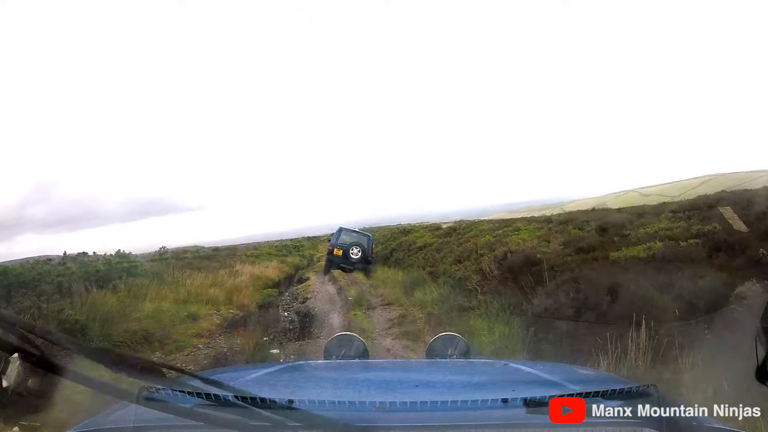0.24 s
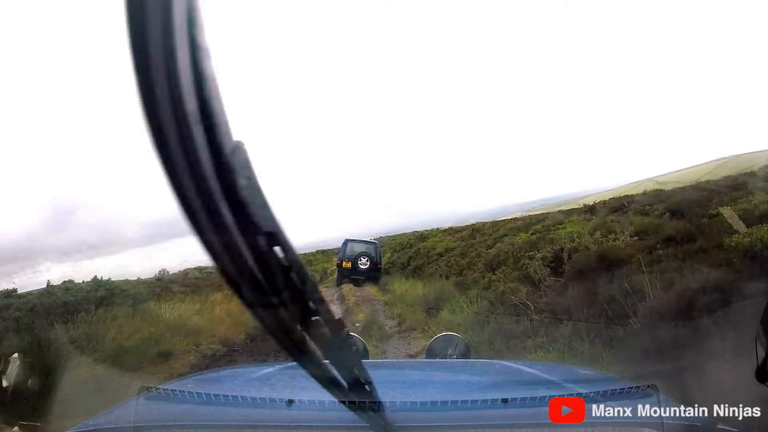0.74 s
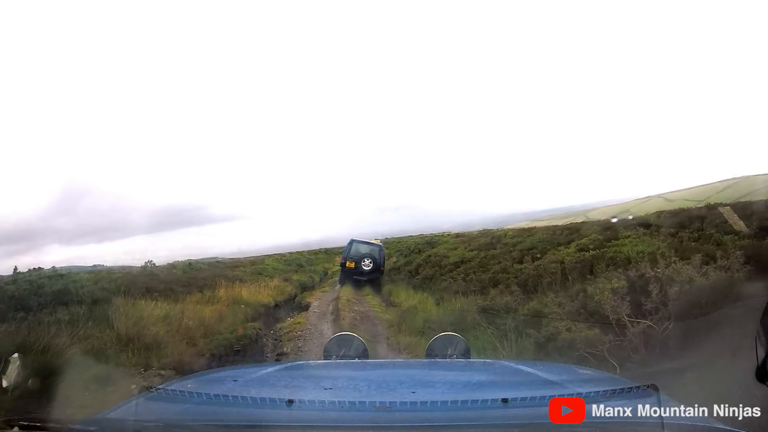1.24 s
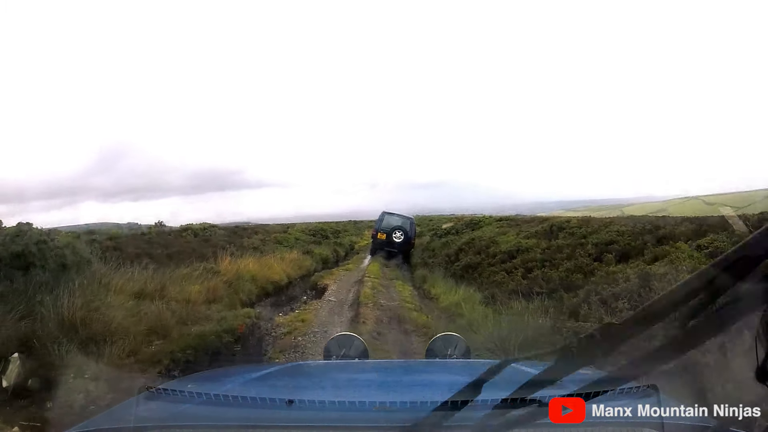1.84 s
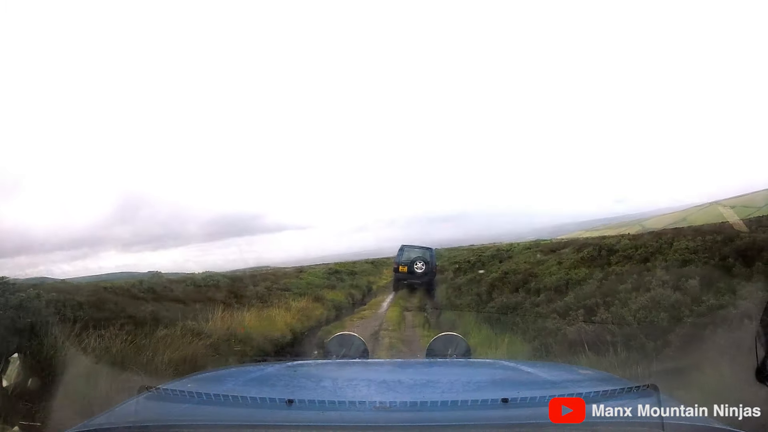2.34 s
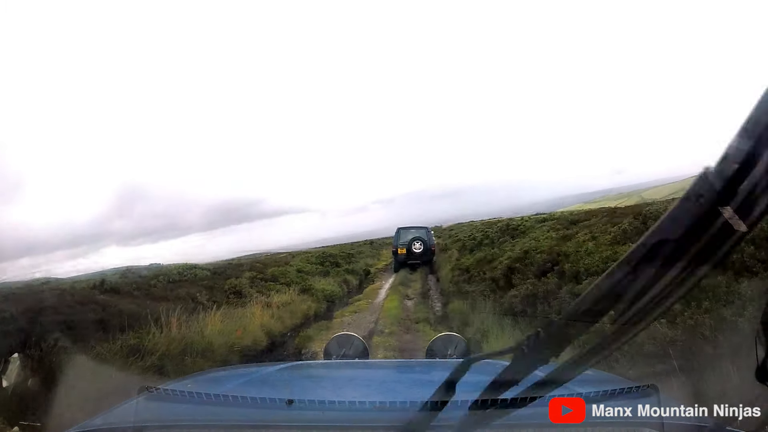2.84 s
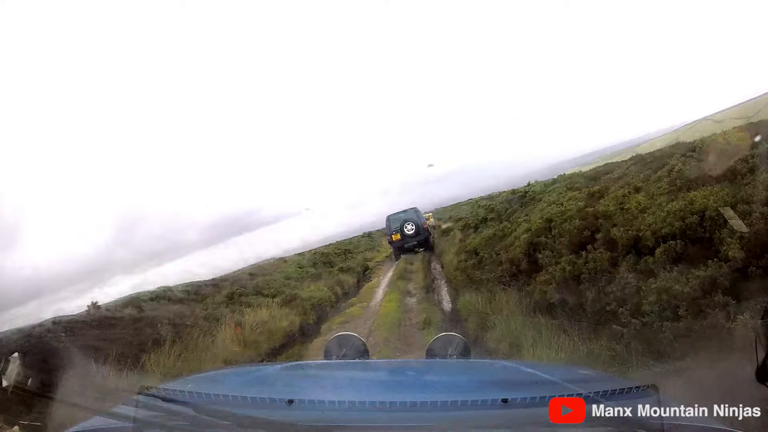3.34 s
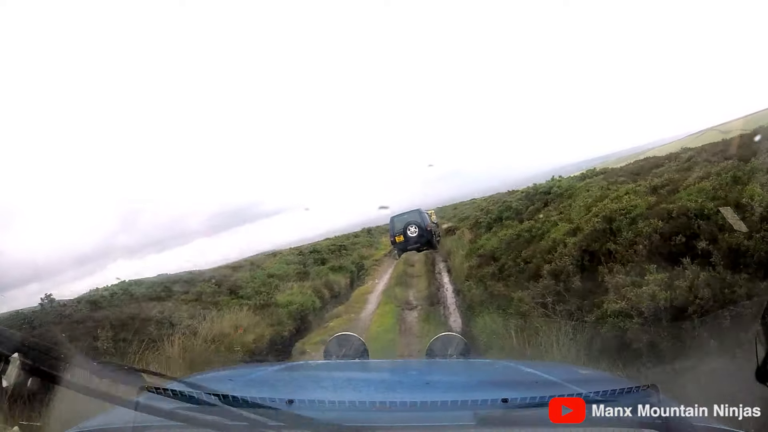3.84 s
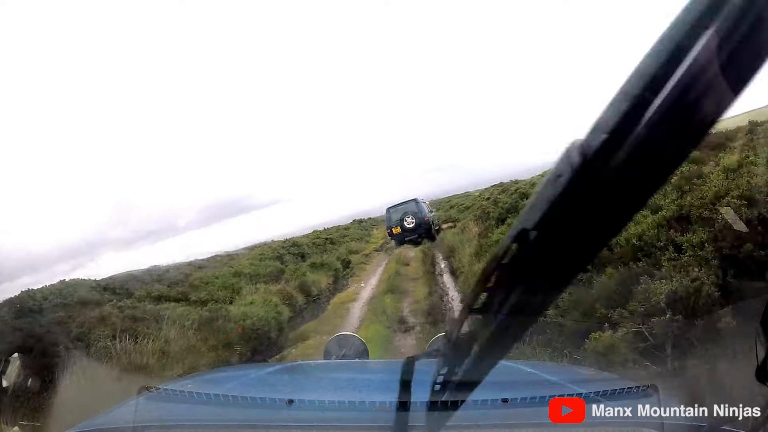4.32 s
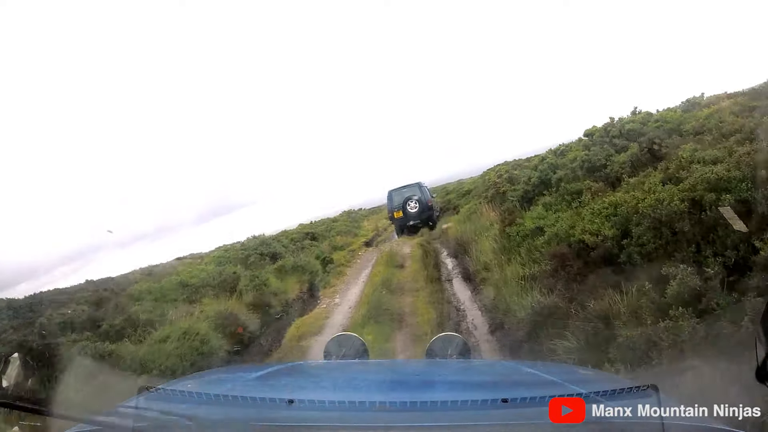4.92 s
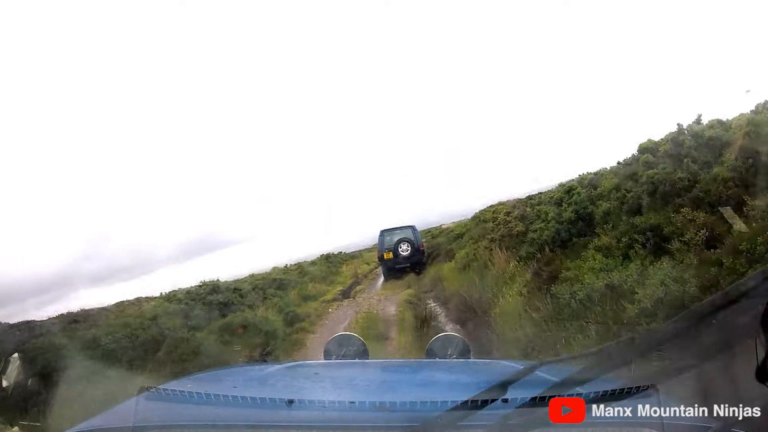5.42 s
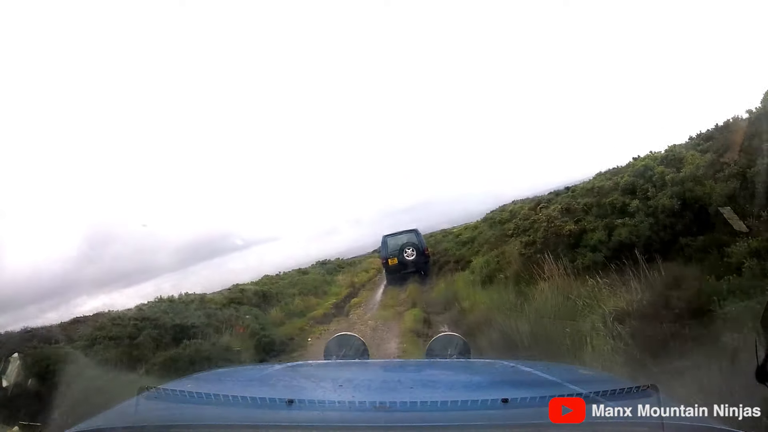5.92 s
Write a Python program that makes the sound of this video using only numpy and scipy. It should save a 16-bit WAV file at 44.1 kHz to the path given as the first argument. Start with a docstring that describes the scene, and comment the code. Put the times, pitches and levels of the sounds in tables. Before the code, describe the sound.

A low engine drone and booming bodywork fill the cabin of a small off-road vehicle driving over ruts. Dull suspension thuds come irregularly, hardest about a third of the way through and again near the end, while the engine pitch wavers and rises in the second half. The microphone is inside, on a plastic mount that gives thin, high creaks. Trim clicks and rustles, with soft wiper strokes and faint tyre hiss behind.

```python
"""Inside a small off-road car on a rutted track

A four-cylinder engine hums through the bulkhead at multiples of its firing rate. Ruts force the shell
and the cabin air into resonance, heard as boom and rumble, while trim rustles and tyres and air hiss.
The microphone's plastic mount creaks by stick-slip friction, and the wipers swish over the screen.
Loose trim ticks, and blows from the suspension ring the modes of the cabin."""
import sys
import numpy as np
from scipy import signal
from scipy.fft import rfft, irfft
from scipy.io import wavfile
from scipy.ndimage import uniform_filter1d

SR = 44100
rng = np.random.default_rng(int(sys.argv[2]) if len(sys.argv) > 2 else 0)


def store_pcm(level_fs):
    """Save levels as 16-bit WAV."""
    pcm = np.round(np.clip(level_fs, -1, 1) * 32767).astype(np.int16)
    wavfile.write(sys.argv[1], SR, np.atleast_2d(pcm).T)


N = 272273
TIME = np.arange(N) / SR

# The engine's course. Each row: time in seconds, firing rate in Hz, level of the fundamental in dB,
# levels of harmonics 2-3 and of harmonics 4-7 in dB ahead of the bulkhead.
ENGINE_COURSE = [(0.0, 47.74, -9, -29, -41), (0.29, 49.96, -11.5, -26.5, -43.5),
                 (0.6, 57.43, -10, -23, -25), (0.9, 51.07, -14.5, -42.5, -47),
                 (1.13, 47.4, -16.5, -31, -44), (1.48, 50.8, -9.5, -27, -30), (1.8, 44.6, -9, -30.5, -34),
                 (2.01, 47.9, -9.5, -33, -41), (2.16, 57.82, -12, -35.5, -26),
                 (2.42, 51.96, -12, -31.5, -32.5), (2.63, 52.92, -32, -31.5, -32),
                 (2.94, 56.74, -29.5, -34, -42.5), (3.13, 51.94, -12, -32, -29.5),
                 (3.54, 60.05, -14, -33, -28), (3.76, 61.54, -15, -22, -25.5),
                 (4.0, 75.53, -21, -34.5, -15.5), (4.12, 74.44, -23, -33, -21.5),
                 (4.25, 70.8, -17, -33.5, -30.5), (4.47, 70.2, -19.5, -30, -27.5),
                 (4.72, 62.97, -12.5, -46, -29.5), (4.93, 79.46, -18, -19.5, -24),
                 (5.12, 80.7, -22.5, -24.5, -20.5), (5.36, 64.96, -13.5, -36.5, -50),
                 (5.79, 63.68, -19, -31, -32.5), (5.98, 70.34, -21, -29.5, -24.5),
                 (6.17, 65.8, -16.5, -37, -35)]
# Transmission through the bulkhead. Each row: frequency in Hz, gain in dB.
BULKHEAD = [(95, -21), (125, 5.5), (155, 2), (190, -12), (235, -8.5), (295, -4.5), (330, -11), (375, -8),
            (450, -20), (600, -27)]
# Shaking by the track. Each row: time in seconds, then shell boom, ground rumble and trim rustle in dB.
TRACK_COURSE = [(0.0, -13.5, -34, -44), (0.25, -10, -31.5, -41.5), (0.6, -11, -26, -39),
                (0.85, -6.5, -28.5, -38), (1.1, -13, -36, -44.5), (1.4, -11, -32.5, -43.5),
                (1.56, -8.5, -27, -38), (1.8, -8, -32, -46), (1.95, -2.5, -20.5, -30.5),
                (2.23, -13, -31.5, -45), (2.46, -5.5, -34, -45.5), (2.62, -6, -27.5, -42.5),
                (2.8, -7, -42.5, -49), (3.02, -10, -34.5, -60), (3.28, -7.5, -23.5, -38),
                (3.58, -12, -34.5, -47.5), (4.0, -6, -24, -37.5), (4.25, -5.5, -22, -41),
                (4.45, -9, -27, -41), (4.64, -7, -23, -33.5), (4.8, -7.5, -30, -46), (5.07, -10, -29, -43),
                (5.26, -5, -22, -35), (5.6, -11.5, -34.5, -43.5), (5.9, -6.5, -28.5, -38),
                (6.17, -5, -30.5, -41)]
# Resonances of the shell and of the cabin. Each row: frequency in Hz, width in Hz, relative level in dB.
SHELL_MODES = [(18.2, 5.25, -4.5), (35, 11.7, -5), (65, 39.8, -14.5)]
CABIN_MODES = [(132, 22.4, 0), (210, 112, -5.5), (295, 47.8, -0.5), (357.6, 68, -3.5), (459.3, 89, -4),
               (603, 167, -11), (756, 147, -11.5), (980, 315, -18.5), (1850, 320, -31), (3054, 1400, -42)]
# Spectra of trim rustle and of tyre and air hiss. Each row: frequency in Hz, relative density in dB.
RUSTLE_SPECTRUM = [(500, -4.5), (900, 0), (1200, -4.5), (2000, -9.5), (2800, -17), (4000, -23.5),
                   (6000, -37), (9000, -53.5), (12000, -69.5), (16000, -100)]
HISS_SPECTRUM = [(1500, -8.5), (3000, -2.5), (4500, -8.5), (6000, -10.5), (8000, -15.5), (10500, -19),
                 (12500, -30.5), (16000, -46)]
# Single slips of the mount. Each row: start in seconds, strength in dB.
MOUNT_SLIPS = [(0.1413, -42.5), (0.1695, -47), (0.194, -47), (0.2144, -44), (0.259, -41), (0.2778, -44),
               (0.3611, -41.5), (0.619, -36), (0.6497, -37.5), (0.6822, -34.5), (0.699, -43), (0.721, -39),
               (0.7841, -46.5), (0.8631, -44), (1.034, -51), (1.0939, -36.5), (1.1196, -45.5), (1.182, -45),
               (1.5387, -43.5), (1.6153, -33), (1.686, -37.5), (1.7083, -49), (1.729, -45), (1.7478, -47),
               (1.811, -41), (1.895, -43), (1.9638, -37.5), (2.0789, -39.5), (2.1948, -43), (2.3257, -38),
               (2.3466, -35), (2.366, -36), (2.601, -36), (2.9962, -46), (3.2969, -43.5), (3.329, -46),
               (3.383, -48), (3.3966, -38), (3.4325, -37), (3.5491, -46), (3.5735, -38), (3.5992, -40.5),
               (3.6221, -39.5), (3.6551, -37.5), (3.6843, -37.5), (3.7057, -38), (3.7349, -36),
               (3.843, -40.5), (4.2759, -45.5), (4.5148, -32), (4.6192, -44), (4.72, -36), (4.776, -38),
               (4.7963, -39), (4.809, -41), (4.821, -43), (4.8438, -40.5), (4.9146, -43), (5.0957, -43),
               (5.103, -44), (5.112, -43), (5.125, -41), (5.1404, -41), (5.159, -40), (5.172, -42),
               (5.182, -40), (5.1921, -36.5), (5.3271, -44), (5.3891, -39.5), (5.439, -40), (5.4677, -43),
               (5.511, -45), (5.7658, -49), (5.7774, -41), (5.794, -41), (5.803, -43), (5.816, -43),
               (5.8227, -40.5)]
# Fast runs of slips. Each row: start and end in seconds, slips per second, strength in dB,
# extra drive to the modes near 4 kHz in dB.
SLIP_RUNS = [(2.197, 2.32, 170, -42, 4.5), (2.602, 2.64, 220, -46.5, 0), (3.378, 3.46, 92, -46.5, 3),
             (4.512, 4.61, 180, -40.5, 5), (4.619, 4.66, 111.4, -48, 3), (4.721, 4.765, 225, -43.5, 4),
             (5.194, 5.245, 150, -41, 3), (5.389, 5.43, 240, -44.5, -2), (5.439, 5.5, 150, -49.5, 4)]
# Resonances of the mount. Each row: frequency in Hz, a third of the width in Hz, gain in dB.
MOUNT_MODES = [(3770, 100, -11.5), (4176, 12, -1.5), (4440, 41, -13.5), (4940, 170, -18), (5700, 220, -14),
               (6050, 50, -7.5), (7150, 130, -10), (8530, 340, -20), (9300, 22, -19), (10130, 53, -16.5),
               (10160, 160, -16.5), (13000, 150, -22), (13100, 260, -27)]
# Broad chatter between those resonances. Each row: frequency in Hz, width in Hz, gain in dB.
CHATTER_BANDS = [(3630, 1200, -15), (5700, 2100, -16.5), (9500, 6400, -25.5), (12400, 2300, -29)]
# Wiper strokes. Each row: start in seconds, length in seconds, level at mid-stroke in dB.
WIPER_STROKES = [(0.18, 0.28, -43), (0.677, 0.34, -40), (1.4, 0.37, -50), (3.815, .5, -39.5),
                 (5.049, 0.24, -41)]
# Resonances of rubber on the screen. Each row: frequency in Hz, width in Hz, relative gain in dB.
BLADE_MODES = [(1150, 250, 2.5), (1900, 400, -7)]
# Contacts of loose trim. Each row: start in seconds, peak level in dB.
TRIM_TICKS = [(0.2467, -23.5), (0.5228, -33), (0.7129, -23), (0.747, -29), (0.7735, -22), (0.8015, -36),
              (1.03, -25.5), (1.139, -28), (1.8201, -20.5), (1.865, -30), (1.888, -21.5), (2.004, -32),
              (2.3515, -28), (2.525, -35), (2.5418, -29), (2.6108, -23.5), (3.0678, -26), (3.1661, -34),
              (3.198, -26.5), (3.2296, -25.5), (3.2762, -23), (3.2964, -24), (3.3186, -25.5),
              (3.538, -29.5), (3.8364, -22), (3.9595, -31), (4.1087, -34), (4.1582, -24.5), (4.243, -20.5),
              (4.305, -29), (4.336, -34), (4.377, -36), (4.572, -16.5), (4.6213, -30), (4.6367, -24),
              (5.1527, -29), (5.2422, -25), (5.3255, -22), (5.3921, -30), (5.488, -33), (5.533, -38),
              (5.574, -37), (5.6458, -27), (5.669, -25), (5.769, -27.5), (5.9462, -35)]
# Suspension blows. Each row: start in seconds, then the levels of door panels, cabin drum, floor pan
# and crack in dB over the first 20 ms.
SUSPENSION_BLOWS = [(0.55, -25.5, -34, -28.5, -35), (0.615, -26, -12.5, -22, -33),
                    (0.77, -31, -26, -40, -28), (1.131, -29.5, -12.5, -36, -34.5),
                    (1.254, -36.5, -25.5, -40, -39.5), (1.296, -27, -16.5, -19.5, -40),
                    (1.754, -28.5, -16.5, -30, -32), (1.822, -37, -30, -17, -25),
                    (1.874, -14, -20, -24, -31), (1.889, -12, -6, -12, -12.5), (1.907, -19, -13, -16, -23),
                    (2.004, -6, -17.5, -13, -22), (2.019, -13, -11, -25.5, -21),
                    (2.333, -35, -13.5, -40, -44.5), (2.511, -32.5, -30, -23.5, -45),
                    (2.916, -32.5, -39, -40, -41), (2.963, -31, -29, -38, -45.5),
                    (2.998, -34, -31, -36.5, -35.5), (3.067, -36.5, -18, -37, -32.5),
                    (3.198, -33, -25.5, -33, -44), (3.237, -24.5, -13.5, -25, -31.5),
                    (3.288, -29, -18, -28, -37), (3.318, -31, -19, -37, -46), (3.534, -43, -23, -25, -38),
                    (3.744, -28, -17, -24.5, -41.5), (4.069, -31, -19, -15.5, -41),
                    (4.376, -34, -16, -18, -29), (4.467, -23.5, -37, -23, -29.5),
                    (5.155, -36, -24, -20, -52), (5.226, -17, -19, -17, -25),
                    (5.236, -7.5, -6.5, -17, -15.5), (5.369, -25, -46, -24, -36),
                    (5.391, -12.5, -28, -19.5, -23.5), (5.397, -14.5, -9, -17, -29),
                    (5.532, -38, -37, -44, -44), (5.574, -45, -23, -45, -42), (5.767, -14, -11, -22.5, -32),
                    (5.827, -24.5, -12.5, -25, -48)]


def undb(db):
    """Amplitude ratio for a level in decibels."""
    return 10 ** (np.asarray(db) / 20)


def unit_rms(x):
    """The signal scaled to an rms of 1."""
    return x / np.sqrt(np.mean(x ** 2))


def ring(x, hz, width):
    """A damped resonator with unit gain at its centre."""
    return signal.lfilter(*signal.iirpeak(hz, hz / width, SR), x)


def body(x, modes):
    """Modal superposition: neighbouring modes take opposite signs, which fills the valleys."""
    return sum((-1) ** k * undb(db) * ring(x, hz, width) for k, (hz, width, db) in enumerate(modes))


def curves(table):
    """Each column interpolated linearly between the times in the first."""
    times, *columns = np.transpose(table)
    return [np.interp(TIME, times, column) for column in columns]


def wander(rate):
    """Smooth random fluctuation with `rate` new values a second and a spread near 1."""
    hold = int(SR / rate)
    steps = np.repeat(rng.standard_normal(N // hold + 1), hold)
    return 2.07 * uniform_filter1d(uniform_filter1d(steps, hold), hold)[:N]


def coloured(spectrum):
    """Noise of unit rms with the given spectral shape."""
    bin_hz = np.maximum(np.fft.rfftfreq(N, 1 / SR), 1)
    hz, db = np.transpose(spectrum)
    gain = undb(np.interp(np.log(bin_hz), np.log(hz), db))
    return unit_rms(irfft(rfft(rng.standard_normal(N)) * gain, N))


def burst(t60_s, rise_s, size=SR // 2):
    """Noise with a fast rise and an exponential decay."""
    t = TIME[:size]
    return rng.standard_normal(size) * (1 - np.exp(-t / rise_s)) * undb(-60 * t / t60_s)


def add(out, start, sound):
    """Superpose a sound from `start` seconds on."""
    i = int(start * SR)
    out[i:i + len(sound)] += sound[:N - i]


def engine():
    """Periodic firing makes a harmonic series; the bulkhead favours overtones near its resonances."""
    firing_hz, fundamental_db, hum_db, growl_db = curves(ENGINE_COURSE)
    phase = 2 * np.pi * np.cumsum(firing_hz * (1 + .002 * wander(25))) / SR
    out = undb(fundamental_db + 1.12 * wander(11)) * np.sin(phase)
    for k in range(2, 8):
        source_db = hum_db if k < 4 else growl_db
        bulkhead_db = np.interp(k * firing_hz, *np.transpose(BULKHEAD))
        out += undb(source_db + bulkhead_db + 1.5 * wander(14)) * np.sin(k * phase + k)
    return np.sqrt(2) * out


def rutted_track():
    """Random forced vibration: ruts shake shell, cabin air and trim, while tyres and air hiss."""
    boom_db, rumble_db, rustle_db = curves(TRACK_COURSE)
    drum_db = -25.5 + 1.61 * (rumble_db + 30)  # the cabin's drumming grows faster than the rumble
    hiss_db = -55.5 + .25 * (rustle_db + 42)  # the hiss follows the rustle only weakly
    jolt_db = wander(40)
    boom = sum(undb(db) * unit_rms(ring(ring(rng.standard_normal(N), hz, width), hz, 2 * width))
               for hz, width, db in SHELL_MODES)
    drum = ring(ring(rng.standard_normal(N), *CABIN_MODES[0][:2]), hz=146, width=60)
    shaking = rng.standard_normal(N) * undb(jolt_db + 1.44 * wander(120))
    rumble_band = signal.butter(2, [170, 1100], "band", fs=SR, output="sos")
    rumble = signal.sosfilt(rumble_band, body(shaking, CABIN_MODES[1:8]))
    rustle = undb(rustle_db + 1.2 * jolt_db + 1.4 * wander(200)) * coloured(RUSTLE_SPECTRUM)
    hiss = undb(hiss_db + 1.2 * jolt_db) * coloured(HISS_SPECTRUM)
    return (undb(boom_db) * unit_rms(boom) + undb(drum_db) * unit_rms(drum)
            + undb(rumble_db) * unit_rms(rumble) + rustle + hiss)


def mount_creaks():
    """Stick-slip friction: each slip, alone or in an uneven run, excites the modes of the plastic."""
    slips = [(start, db, 1.5 + 2 * rng.standard_normal()) for start, db in MOUNT_SLIPS]
    for start, end, rate, db, low_extra_db in SLIP_RUNS:
        gap_scatter, level_scatter = rng.standard_normal((64, 2)).T
        times = start + np.cumsum(np.exp(.25 * gap_scatter)) / rate
        slips += [(t, db + 2 * scatter, low_extra_db)
                  for t, scatter in zip(times, level_scatter) if t < end]
    low_drive, high_drive = np.zeros(N), np.zeros(N)
    for start, db, low_extra_db in slips:
        scrape = burst(t60_s=.058, rise_s=.0001, size=2048)
        scrape[4] += 4  # the snap of release
        add(high_drive, start, undb(db) * scrape)
        add(low_drive, start, undb(db + low_extra_db) * scrape)
    chatter = body(high_drive * rng.standard_normal(N), CHATTER_BANDS)
    modes = [(hz, 3 * width, db) for hz, width, db in MOUNT_MODES]
    return undb(15.5) * (body(low_drive, modes[:3]) + body(high_drive, modes[3:]) + chatter)


def wipers():
    """Sliding friction of rubber on glass: band noise swells and fades with each juddering stroke."""
    swell = sum(undb(db) * np.sin(np.pi * np.clip((TIME - start) / length, 0, 1))
                for start, length, db in WIPER_STROKES)
    judder = undb(2 * wander(60))
    friction = ring(rng.standard_normal(N), hz=1400, width=1500)
    return swell * judder * unit_rms(body(friction, BLADE_MODES))


def trim_ticks():
    """Short, hard impacts excite a heavily damped resonance whose pitch differs at each contact."""
    out = np.zeros(N)
    for start, db in TRIM_TICKS:
        hz = 1720 * np.exp(.07 * rng.standard_normal())
        contact = burst(t60_s=.03, rise_s=.0004, size=4096)
        contact[8] += 9  # the snap of impact
        tick = ring(ring(contact, hz, .5 * hz), hz, .88 * hz)
        add(out, start, tick * undb(db) / np.abs(tick).max())
    return out


def suspension_knocks():
    """Impact excitation: each blow, low-pass filtered by rubber bushes, rings the parts of the cabin."""
    out = np.zeros(N)
    # door panels, cabin drum, floor pan, crack
    parts = CABIN_MODES[3:5], CABIN_MODES[:1], CABIN_MODES[1:3], CABIN_MODES[5:]
    bushes = [signal.butter(3, cutoff_hz, fs=SR, output="sos") for cutoff_hz in (300 * 3, 300, 600, 2800)]
    for start, *part_db in SUSPENSION_BLOWS:
        shudder = burst(t60_s=.12, rise_s=.0022)
        shudder[20] += 9  # the push of the blow
        for db, modes, bush in zip(part_db, parts, bushes):
            knock = body(signal.sosfilt(bush, shudder), modes)
            add(out, start, knock * undb(db) / knock[:SR // 50].std())
    return out


def scene():
    """Linear superposition: the pressures of all sources add in one channel."""
    return (engine() + rutted_track() + suspension_knocks() + trim_ticks() + mount_creaks()
            + wipers())[None]


def record(dry):
    """Compression: the camera's gain ducks after loud moments; peaks are rounded and the top is cut."""
    memory_s, knee_db, top_hz = .08, -13.5, 15100
    pole = np.exp(-1 / (memory_s * SR))
    running_rms = np.sqrt(signal.lfilter([1 - pole], [1, -pole], dry ** 2))
    ducked = dry * (1 + (running_rms / undb(knee_db)) ** 2) ** -.25
    rounded = ducked / (1 + ducked ** 4) ** .25
    return signal.sosfilt(signal.ellip(8, .2, 70, top_hz, fs=SR, output="sos"), rounded)


dry = scene()
out = record(dry)
store_pcm(out)
```